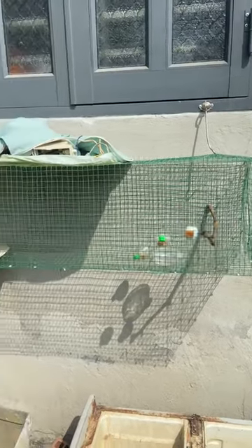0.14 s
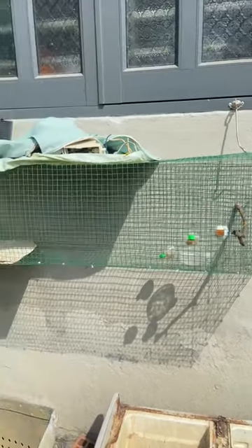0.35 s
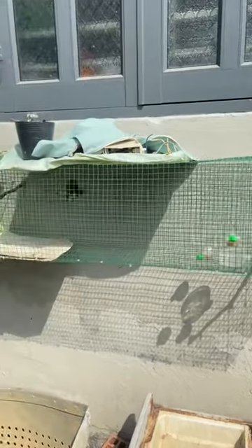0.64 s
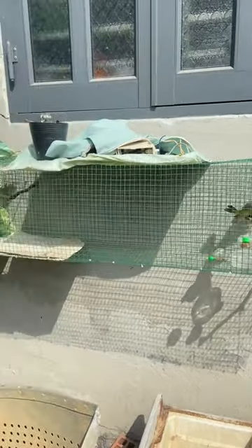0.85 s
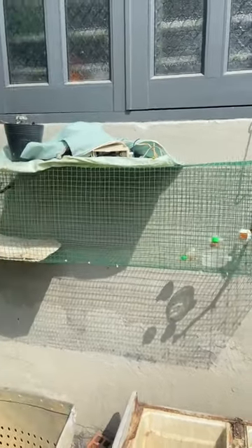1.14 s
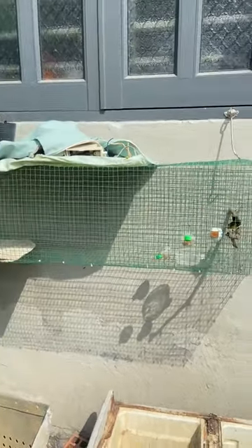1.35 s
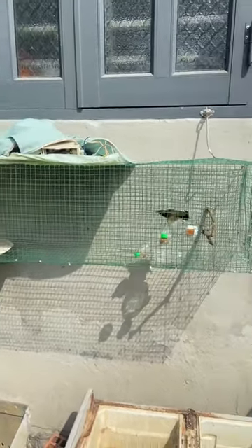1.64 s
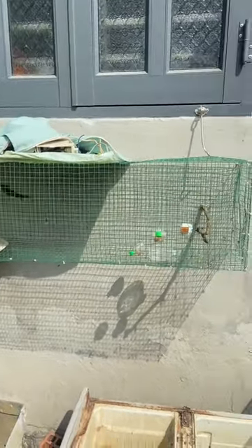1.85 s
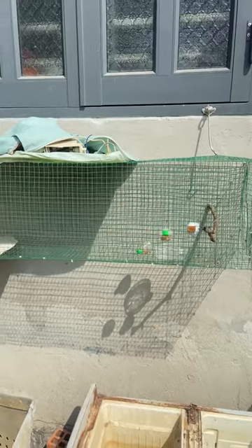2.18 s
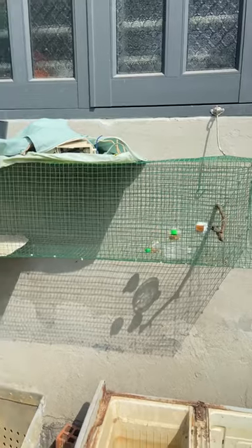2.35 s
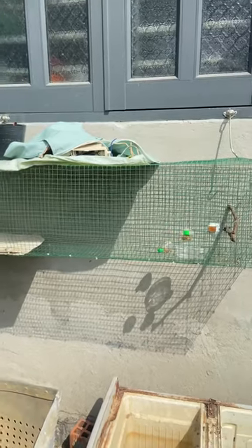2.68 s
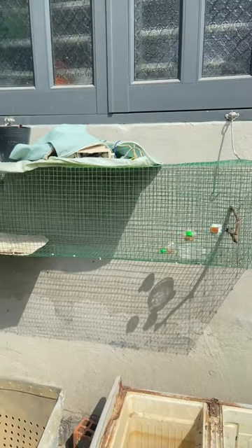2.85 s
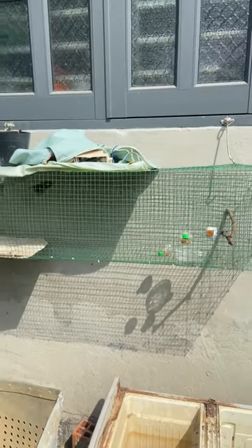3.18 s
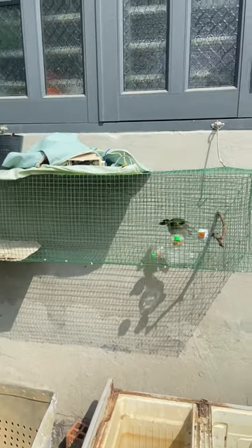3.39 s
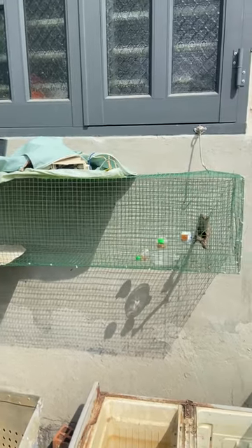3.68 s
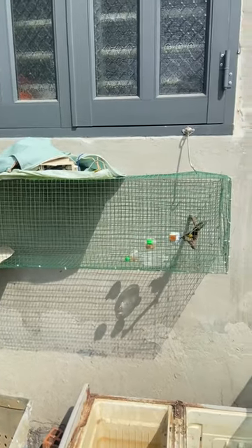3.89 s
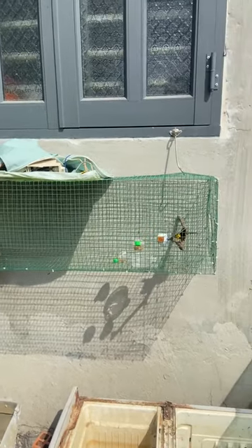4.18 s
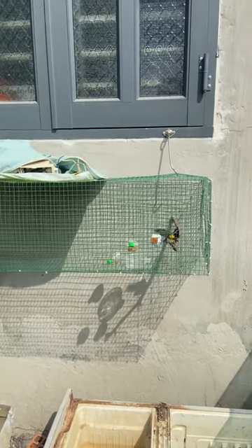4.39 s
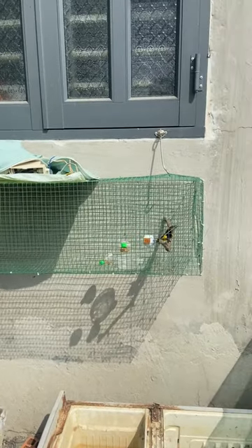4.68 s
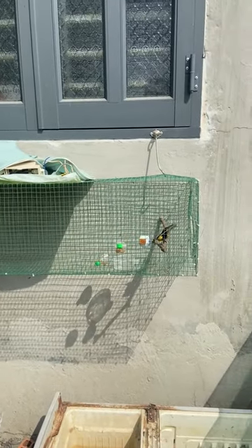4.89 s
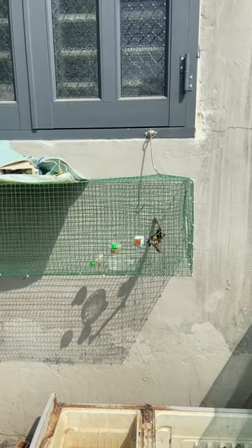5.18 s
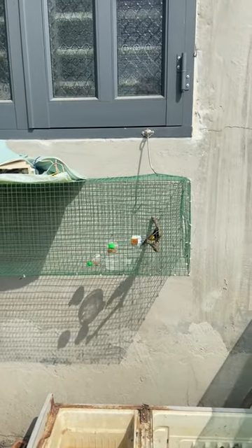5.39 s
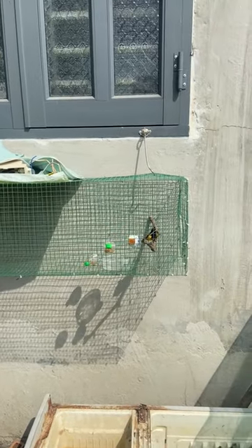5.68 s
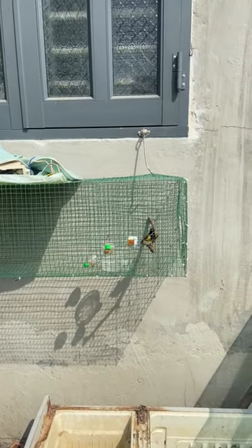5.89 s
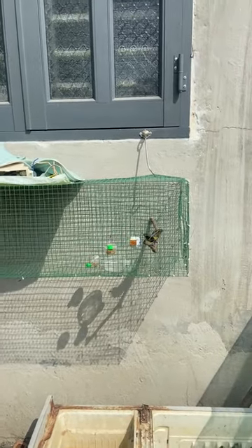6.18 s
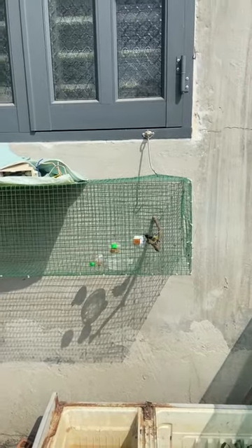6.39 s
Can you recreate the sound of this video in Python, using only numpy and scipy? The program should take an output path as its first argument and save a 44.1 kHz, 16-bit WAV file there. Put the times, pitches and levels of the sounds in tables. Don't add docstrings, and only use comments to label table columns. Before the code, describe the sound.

A low, uneven town rumble runs throughout, with short, close reflections from yard walls. Distant birds scold harshly, and a falling chirp comes at 0.4 s. A dull tap sounds at 0.6 s, just before the caged bird's first short, scratchy rasp; another follows at 1.8 s with a soft wing flick. Between 0.95 and 2.4 s a second bird, further away, whistles six nearly pure slurred notes, falling and rising. Quiet until wings flutter near 3.1 s and a faint rasp at 3.2 s. From 3.5 s the near bird sings: quick alternating rising chirps and small arches, getting louder, then from 4.3 s bright repeated buzzes with slurred chirps, about four a second, strongest near 4.8 s, closing with a clean falling note at 5.7 s. Tiny bright ticks dot the song. Low handling thumps at 6.2 s and a last dull tap at 6.5 s end it.

```python
import sys
import numpy as np
from scipy import signal
from scipy.fft import rfft, irfft
from scipy.io import wavfile
from scipy.ndimage import uniform_filter1d

SR = 44100
rng = np.random.default_rng(int(sys.argv[2]) if len(sys.argv) > 2 else 0)


def field_ratio(decibels):
    return 10 ** (np.asarray(decibels, dtype=float) / 20)


def persist_wave(psi):
    counts = np.round(np.clip(psi, -1, 1) * 32767).astype(np.int16)
    wavfile.write(sys.argv[1], SR, np.atleast_2d(counts).T)


N = 288414


def evened(x):
    return x / np.sqrt(np.mean(abs(x) ** 2) + 1e-20)


def read(points, hz):
    f, value = np.transpose(points)
    return np.interp(np.log(hz + 1), np.log(f + 1), value)


def add(mix, start_s, sound, pan_db):
    part = mix[:, round(start_s * SR):][:, :len(sound)]
    part += sound[:part.shape[1]] * field_ratio(np.array([[.5], [-.5]]) * pan_db)


def faded(x, share):
    return x * signal.windows.tukey(len(x), share)


def flutter(size, width_hz):
    z = rng.standard_normal((size, 2)) @ [1, 1j]
    bell = np.exp(-(np.fft.fftfreq(size, 1 / SR) / width_hz) ** 2)
    return evened(np.fft.ifft(z * bell))


def phasor(hz):
    return np.exp(2j * np.pi * np.cumsum(hz) / SR)


def yard(x, late_db):
    # hz, t60_s
    decay = [(500, 0.4), (3000, 0.3), (5000, 0.31), (6500, 0.19), (8000, 0.1), (11000, 0.18)]
    taps = np.zeros((3, SR))
    at = np.arange(500, SR - 20, 20) + rng.integers(0, 20, (3, (SR - 501) // 20))
    np.put_along_axis(taps, at, rng.choice([-1., 1.], at.shape), 1)
    hz, t, z = signal.stft(taps, SR, nperseg=256)
    fall_db = -60 * t / read(decay, hz)[:, None]
    envelope = field_ratio(fall_db) + field_ratio(late_db + 0.5 * fall_db)
    tail = signal.istft(z * envelope, SR, nperseg=256)[1]
    tail = tail[0] + tail[1:]
    return signal.fftconvolve(x[None], tail / np.linalg.norm(tail[0]), axes=1)[:, :N]


def episodes(t, events):
    edge_s = 0.067
    return sum(amount * np.clip(np.minimum(t - s, s + length - t) / edge_s + .5, 0, 1)
               for s, length, amount in events)


def town():
    # hz, level_db (per Hz)
    common = [(15, -49), (30, -9), (53, 9), (76, -7.5), (180, -15), (450, -25.5), (680, -37.5), (850, -62),
              (1080, -43.5), (1430, -33), (2200, -36.5), (4300, -46), (6000, -60.5), (15800, -64.5)]
    # hz, level_db (per Hz)
    opposite = [(15, -40), (25, -2), (63, -3.5), (137, -13), (587, -13), (1030, -19), (1280, -19),
                (1680, -34), (1820, -59), (2590, -38), (5370, -51.5), (7620, -55.5), (15800, -59.5)]
    # time_s, level_db
    traffic = [(0.0, 3.5), (1.3, 1), (3.9, 0.5), (4.1, -2), (6.1, 2), (6.3, 6), (6.54, 1.5)]
    # start_s, length_s, level_db
    hollow_fills = [(0.0, 0.57, 2.5), (.6, 0.088, 15), (.92, 0.055, -0.5), (1.44, 0.85, 3.5),
                    (3.117, 0.17, -0.5), (3.38, 0.79, 5), (4.76, 0.43, 1), (5.175, 0.49, 1), (6.118, .1, 3),
                    (6.22, 0.37, 11)]
    # start_s, length_s, level_db
    lower_dips = [(1.3, .13, -17.5), (3.054, .14, -28), (3.755, 0.22, -41), (4.037, 0.079, -16),
                  (4.62, 0.096, -12), (4.81, 0.31, -30), (5.377, 0.15, -7), (5.818, 0.14, -19)]
    hollow_floor_db = -32

    frames, hz = N // 512 + 5, np.fft.rfftfreq(2048, 1 / SR)
    t = (np.arange(frames) - 1) * 512 / SR
    hz = hz[:, None]
    a, b, c, d, patches = rng.standard_normal((frames, 1025, 5)).T
    patches = uniform_filter1d(uniform_filter1d(patches, size=9, axis=0), size=6, axis=1)
    patches = evened(patches) * np.clip(hz / 300, .3, 1)
    time_s, near_db = np.transpose(traffic)
    swell_db = np.interp(t, time_s, near_db) / (1 + (hz / 200) ** 2)

    filled = episodes(t, [(s, length, field_ratio(db)) for s, length, db in hollow_fills])
    hollow_db = 20 * np.log10(filled + field_ratio(hollow_floor_db)) * np.exp(-((hz - 1060) / 270) ** 6)
    hollow_db += 8.6 * patches[:, ::-1] * np.exp(-((hz - 800) / 300) ** 2)
    hollow_db += episodes(t, lower_dips) * np.exp(-((hz - 780) / 210) ** 6)

    mid_db = read(common, hz) + 4.1 * patches + swell_db + hollow_db - 62.0
    side_db = read(opposite, hz) + 1.7 * patches + swell_db - 71.0
    mid = (a + 1j * b) * field_ratio(mid_db)
    side = (c + 1j * d) * field_ratio(side_db)
    side -= .2 * mid / (1 + (hz / 90) ** 2)
    return signal.istft(np.array([mid + side, mid - side]), nperseg=2048, noverlap=1536)[1][:, :N]


def small_sounds():
    # start_s, peak_db, ring_hz, t60_s
    knocks = [
        (0.622, -46.5, 644, 0.027),
        (0.913, -62.5, 2340, 0.027),
        (6.486, -54.5, 640, 0.029),
        (3.729, -39, 4900, 0.0074),
        (4.3194, -42, 4760, 0.0062),
        (5.3408, -35.5, 4080, 0.0069),
        (6.2053, -48, 4350, 0.0048),
    ]
    # start_s, peak_db, pitch_hz, t60_s
    thumps = [
        (0.231, -49, 77, 0.22),
        (6.211, -37, 172, 0.045),
        (6.293, -36.5, 73, 0.15),
    ]
    # start_s, end_s, pitch_hz, level_db, share of opposite polarity (0-1)
    hums = [(1.6, 2.15, 180, -61, 0.18), (4.95, 6.2, 180, -65.5, 0.13), (4.5, 7.1, 300, -70, 0.34),
            (2.64, 2.79, 647, -62.5, 0.36), (6.1, 6.54, 2800, -92.5, 0.81), (3.0, 3.2, 3420, -82, 0.11),
            (5.88, 5.98, 1400, -76.5, 0.16), (1.45, 1.62, 1400, -79, .16), (2.18, 2.35, 1400, -78, .16),
            (4.3, 6.3, 1400, -84, .16), (3.22, 3.31, 700, -70, .3), (3.93, 4.01, 700, -72, 0.32),
            (4.35, 4.46, 700, -70, 0.35), (6.1, 6.19, 940, -77.5, 0.38), (5.61, 5.71, 700, -72, .3),
            (1.85, 2.0, 570, -77, 0.34)]

    out, t = np.zeros((2, N)), np.arange(8000) / SR
    for s, db, hz, t60 in knocks:
        ring = np.sin(2 * np.pi * hz * t) * field_ratio(-60 * t / t60) * np.minimum(t * hz / 2, 1)
        tick = uniform_filter1d(rng.standard_normal(len(t)), size=4) * field_ratio(-60 * t / 0.00132)
        add(out, s, field_ratio(db) * (ring + 0.3 * (hz < 3000) * tick), 0)
    for s, db, hz, t60 in thumps:
        thump = np.sin(2 * np.pi * hz * t) * np.minimum(t / 0.0077, 1)
        add(out, s, field_ratio(db - 60 * t / t60) * thump, -1.5)
    for start, end, hz, db, opposite in hums:
        u = np.arange(start, end, 1 / SR)
        width_hz = 5.2 + 75 * (680 < hz < 1000)
        tone = (flutter(len(u), width_hz) * np.exp(2j * np.pi * hz * u)).real
        hum = np.zeros((2, N))
        add(hum, start, field_ratio(db) * faded(tone, .3), 0)
        out += hum * [[1], [1 - 2 * opposite]]
    return out


def harsh_call(out, time_s, level_db, centre_hz, spread_hz, pulsed):
    t = np.arange(time_s[0], time_s[-1], 1 / SR)
    turn = phasor(np.interp(t, time_s, centre_hz))
    if pulsed:
        grain = 1 + 0.41 * np.cos(2 * np.pi * 170 * t)
    else:
        grain = 1 + .5 * flutter(len(t), 81).real
    harsh = grain * (flutter(len(t), spread_hz) * turn).real
    add(out, time_s[0], field_ratio(np.interp(t, time_s, level_db)) * faded(harsh, .1), 0)


def far_birds():
    # start_s, rise_s, fall_s, peak_db,
    # centre_hz
    scolds = [(.385, 0.016, 0.23, -65.5, 5460), (0.82, 0.18, 0.11, -67.5, 5100),
              (1.0, 0.14, 0.17, -67, 5320), (.395, .02, .045, -57, 5300), (1.56, 0.25, .02, -64, 4720),
              (2.45, 0.075, 0.25, -64, 5210), (3.08, 0.13, .01, -72, 4880), (3.25, .04, 0.25, -64, 5170),
              (3.6, .015, 0.048, -76, 2610), (2.2, 0.092, 0.097, -73, 6300), (3.72, 0.1, .2, -65, 2690),
              (3.93, 0.095, .03, -69, 2620), (5.35, 0.06, .08, -49.5, 4060), (.74, 0.046, .18, -66, 5500),
              (5.745, 0.012, 0.045, -68, 2750), (4.73, 0.012, 0.036, -67.5, 2900),
              (.44, .02, .05, -67, 2600), (6.15, 0.055, 0.22, -74, 5470), (6.42, 0.092, .02, -76.5, 4590)]
    # time_s, level_db, centre_hz
    chirp = [(.378, -73, 4790), (0.391, -65, 4900), (.403, -58, 4700), (0.408, -49, 4500),
             (.43, -50.5, 4330), (0.444, -52.5, 3850), (.462, -57, 3160), (0.474, -64, 3050),
             (0.499, -73, 2940)]
    out = np.zeros((2, N))
    for s, rise, fall, peak_db, hz in scolds:
        level_db = peak_db + np.array([-17, 0, -16.5])
        harsh_call(out, [s, s + rise, s + rise + fall], level_db, np.full(3, hz), 0.23 * hz, False)
    harsh_call(out, *np.transpose(chirp), spread_hz=680, pulsed=True)
    return out + field_ratio(-5.5) * yard(out.mean(0), late_db=-3.0)


def syllable(shape, pitch, length, spread_hz, puff_db):
    s, hz, db, rough = np.transpose(shape)
    t = np.arange(s[0] * length, s[-1] * length, 1 / SR)
    hz, db, rough = (uniform_filter1d(np.interp(t, s * length, c), 90) for c in (hz * pitch, db, rough))
    rough = np.clip(rough, 0, 1)
    throb_hz = 245 + 60 * flutter(len(t), 65).real
    throb = 1 + 0.55 * rough * np.cos(2 * np.pi * (np.cumsum(throb_hz) / SR + rng.random()))
    membrane = throb * (np.sqrt(1 - rough) + np.sqrt(rough) * flutter(len(t), spread_hz))
    turn = phasor(hz)
    tone = turn + field_ratio(-31.0) * turn ** 2 + field_ratio(-25.5) * turn ** 3
    breath = field_ratio(-28.0) * np.sqrt(rough) * np.diff(rng.standard_normal(len(t) + 2), 2)
    air = signal.lfilter(*signal.butter(4, 3400 / (SR / 2), "high"), rng.standard_normal(len(t)))
    puff = field_ratio(puff_db - 60 * (t - t[0]) / 0.15) * air
    voice = field_ratio(db) * ((membrane * tone).real + breath)
    return s[0] * length, faded(voice + puff, .06)


def caged_bird():
    # time_s (from the onset), pitch_hz, level_db, roughness (0-1)
    rasp = [(-.004, 4282, -16.5, 1), (.008, 5160, -8.5, 1), (0.022, 5600, 3, 1), (.036, 5847, 2.5, .7),
            (.052, 6300, -2, .6), (.066, 6520, -18, 0.5), (.07, 6600, -27, 0.5)]
    under = [(-.004, 2700, -30, .9), (.006, 3610, -23, .9), (.016, 4253, -11.5, .8), (.04, 4750, -8.5, .9),
             (.066, 4900, -19, .9)]
    opening = [(-.004, 5980, -1, 0), (.006, 6400, 6.5, 0), (.016, 6600, 1.5, 0.2), (.03, 6290, 4, 0.1),
               (.042, 6150, 9, .25), (.052, 5870, -13, 0)]
    rise = [(-.028, 4160, -22.5, 0.25), (-.018, 4204, -23, 0.15), (-.006, 4406, -15.5, 0.2),
            (-.001, 4840, -2.5, 0.11), (.012, 5285, 2, 0.04), (.024, 5280, -7, .15), (.028, 4820, -14, 0.3),
            (.033, 3970, -18, .4)]
    arch = [(-.003, 5880, -14, 0.1), (.006, 6415, 4, 0.2), (0.013, 6445, -15, 0.1),
            (.028, 7240, -15.5, 0.08), (.042, 6400, -6, .4), (.058, 5854, -8.5, 0.6)]
    pickup = [(-.001, 5956, -14.5, 0.3), (.008, 6296, -16.5, 0.3), (.014, 6270, -24, .5),
              (.018, 6120, -34, .5)]
    stroke = [(-.024, 2886, -40.5, 1), (-.008, 2897, -43, .7), (-.003, 4200, -27, .5),
              (.002, 5610, -28, .7)]
    buzz = [(-.003, 5940, -25, .4), (.0, 6024, -5.5, 0.31), (.012, 6394, -5.5, 0.39),
            (0.024, 6566, -15.5, 0.6), (.042, 6800, -14, 0.5), (.047, 6850, -31.5, 0.5)]
    hook = [(-.002, 4737, -12, 0.05), (.009, 5305, -6, 0.05), (.015, 5087, -14.5, 0.3),
            (.024, 4696, -12, 0.5), (.034, 4500, -13.5, 0.4), (.039, 4500, -26.5, 0.3)]
    slur = [(-.004, 4490, -20, 0.1), (0.0, 4614, -2.5, .05), (.014, 5304, 1.5, 0.03), (.022, 5642, -14, .2),
            (.034, 5250, -4, 0.45), (.047, 3880, -20.5, 0.85)]
    closing = [(-.046, 4810, -10, 0.1), (-.036, 5240, -6.5, 0.15), (-.02, 4450, -14, 0.5),
               (-.004, 4650, -12.5, 0.1), (0.0, 4744, 2, 0.07), (.02, 5387, -3, 0), (.034, 5000, -9.5, .2),
               (.044, 4150, -6, 0.2), (.05, 3525, -11.5, 0.2)]
    # start_s, peak_db, left_right_db, pitch factor, length factor
    rasps = [
        (0.652, -34, 0.045, 1.07, 1),
        (1.8107, -35, 0.18, 1.06, 0.94),
        (3.1866, -39, 0.72, 1, 1.12),
    ]
    openings = [
        (3.519, -45, 1, 1.001, 0.83),
    ]
    rises = [(3.5865, -29.5, -2, 0.99, 0.89), (3.763, -28, 0, 0.97, 1.11), (3.922, -26.5, -1.0, 0.99, 0.96),
             (4.0842, -26, 1, 1.001, 0.9), (4.2331, -25, -2, 0.99, 0.77)]
    arches = [(3.69, -33, -1, 0.98, 0.82), (3.8496, -30.5, -1, 1.012, 0.83), (4.012, -31.5, 0, 1.001, 0.91),
              (4.1619, -30, 1, 1.01, 1.001)]
    pickups = [(4.3205, -21.5, 0.5, 1.005, 0.97), (4.555, -19, 1.1, 1.02, 0.95),
               (4.806, -18.5, 0.4, 1.02, 0.9), (5.043, -21, 0.4, 1.01, 1.05),
               (5.292, -22.5, 0.1, 0.99, 1.1), (5.559, -23, 0.5, 1.001, 1.05)]
    buzzes = [(4.3413, -20.5, 0.98, 1, 0.97), (4.575, -19.5, 1.1, 1.02, 1.002),
              (4.8249, -18, 0.4, 1.015, 0.78), (5.0652, -19, 0.0, 1.012, 1.002),
              (5.3142, -19.5, 0.0916, 1.002, 1.002), (5.5807, -20, 0.55, 1, 0.93)]
    hooks = [(4.4124, -24.5, -2.5, 1.003, 0.99), (4.65, -24, 1.5, 0.98, 1.04),
             (4.898, -23.5, -3, 0.99, 0.99), (5.142, -25, -2.5, 0.99, 1.01), (5.386, -25, -2.5, 0.97, 1.05)]
    slurs = [(4.454, -23.5, -2.5, 0.99, 0.97), (4.6939, -24.5, 1.5, 0.98, 1.04),
             (4.9389, -24.5, -3.5, 0.98, 1), (5.1845, -24, -2.5, 0.98, 0.98), (5.429, -27, -3, 0.98, 1.11)]
    closings = [
        (5.7073, -27.5, 1.5, 1.001, 1.001),
    ]
    # shape, syllables, spread_hz, puff_db
    song = [
        (rasp, rasps, 520, -22), (under, rasps, 550, -60),
        (opening, openings, 450, -30), (rise, rises, 350, -40), (arch, arches, 500, -34),
        (pickup, pickups, 600, -19), (stroke, buzzes, 250, -60), (buzz, buzzes, 650, -30),
        (hook, hooks, 400, -40), (slur, slurs, 450, -50), (closing, closings, 450, -40)]

    out = np.zeros((2, N))
    for shape, rows, spread_hz, puff_db in song:
        for s, db, pan_db, pitch, length in rows:
            lead_s, sound = syllable(shape, pitch, length, spread_hz, puff_db)
            add(out, s + lead_s, field_ratio(db - 8.0) * sound, pan_db)
    ground = field_ratio(-5.0) * np.roll(out, round(.0042 * SR), axis=1)
    wall = field_ratio(-8.0) * np.roll(out[::-1], round(0.011 * SR), axis=1)
    smeared = out.mean(0) * (1 + 0.97 * flutter(N, 300).real)
    patchy = 1 + .4 * flutter(N, 30).real
    return out + ground + wall + field_ratio(-11.5) * yard(smeared, late_db=-8.0) * patchy


def whistler():
    # time_s, effort_db, pitch_hz
    whistles = [
        [(0.955, -86.5, 5400), (0.977, -63, 4220), (1.001, -43.5, 3920), (1.051, -42.5, 3576),
         (1.11, -37, 3579), (1.23, -56, 3430)],
        [(2.006, -58, 4595), (2.024, -43.5, 4615), (2.036, -36, 4190), (2.052, -44.5, 3245),
         (2.066, -35.5, 2851), (2.1, -42.5, 2690), (2.13, -42, 2640), (2.156, -46, 2744), (2.175, -57, 2700)],
        [(1.285, -53.5, 3890), (1.295, -40.5, 4020), (1.327, -37.5, 4070), (1.395, -36, 4168),
         (1.475, -35.5, 4204), (1.5, -49.5, 4046)],
        [(1.58, -61.5, 2800), (1.608, -42.5, 2723), (1.644, -33, 2772), (1.71, -36.5, 2932), (1.775, -36, 2953)],
        [(1.865, -50.5, 3110), (1.889, -38.5, 3413), (1.935, -36, 3344), (1.965, -53, 3320)],
        [(2.21, -54, 2780), (2.228, -48, 3220), (2.244, -39, 3260), (2.256, -38, 3367), (2.266, -33.5, 3342),
         (2.28, -32, 3262), (2.37, -50.5, 3277)],
    ]
    # left_right_db, overtones_db, wavering (0-1), width_hz
    headings = [(-0.5, -51, .37, 150), (0, -42, 0.9, 220), (0, -53, 0.5, 130), (0.5, -48, .45, 74),
                (6.5, -49, .37, 190), (8, -50, .3, 82)]
    out = np.zeros((2, N))
    for rows, (pan_db, overtones_db, waver, waver_hz) in zip(whistles, headings):
        s, *columns = np.transpose(rows)
        t = np.arange(s[0], s[-1], 1 / SR)
        db, hz = (uniform_filter1d(np.interp(t, s, c), 300, mode="nearest") for c in columns)
        turn = phasor(hz)
        fading = 1 + waver * flutter(len(t), waver_hz)
        glide = np.clip(abs(np.gradient(hz)) / .5, 0, .9)
        fading += glide * flutter(len(t), 260)
        overtones = field_ratio(overtones_db) * (.5 + flutter(len(t), 140)) * (turn ** 2 + 0.43 * turn ** 3)
        note = (fading * turn + overtones).real
        add(out, s[0], field_ratio(db + 0.5) * faded(note, .1), pan_db)
    return out + field_ratio(-8.0) * yard(out.mean(0), late_db=-11)


def wings():
    # start_s, length_s, first_db, last_db
    flights = [
        (1.545, 0.11, -74, -78.5),
        (1.797, 0.1, -63, -66.5),
        (3.054, .24, -89, -64.5),
        (3.404, 0.137, -74.5, -68.5),
        (6.401, 0.12, -98.5, -86),
    ]
    out = np.zeros((2, N))
    for s, length, first_db, last_db in flights:
        t = np.arange(0, length, 1 / SR)
        air = signal.lfilter([1, -1], np.poly([.75, .7, .4]), rng.standard_normal(len(t)))
        beats = 1 + .5 * np.cos(2 * np.pi * 28 * t)
        level = field_ratio(first_db + (last_db - first_db) * t / length - 4.0)
        add(out, s, level * beats * faded(evened(air), .3), 0)
    return out


def scene():
    return town() + small_sounds() + far_birds() + caged_bird() + whistler() + wings()


def starve(x):
    hz, t, z = signal.stft(np.array([x[0] + x[1], x[0] - x[1]]) / 2, SR, nperseg=1024)
    treble = hz[:, None] > 1500
    power = uniform_filter1d(abs(z) ** 2, size=7, axis=1)
    mask = uniform_filter1d(power[0] * treble, size=70, axis=0)
    mask = uniform_filter1d(mask, size=60, axis=0, origin=22)
    margin_db = 10 * np.log10((abs(power) + 1e-16) / (abs(mask) + 1e-16)) + 36.9
    keep = np.where(treble, np.clip(margin_db / 4, .03, 1), 1)
    mid, side = signal.istft(z * keep, SR, nperseg=1024)[1][:, :N]
    return np.array([mid + side, mid - side])


def passband(hz, low_hz, high_hz):
    return .25 * (1 + np.tanh((hz - low_hz) / 70)) * (1 - np.tanh((hz - high_hz) / 70))


def held(power):
    edges = np.r_[0, np.arange(930, N, 1024)]
    sizes = np.diff(np.r_[edges, N])
    means = np.add.reduceat(power, edges, axis=1) / sizes
    return abs(uniform_filter1d(np.repeat(means, sizes, axis=1), size=100))


def rebuilt_treble(z, hz):
    # low_hz, high_hz, upward_shift_hz
    copies = [(6890, 7580, 5512.5), (7580, 8960, 5512.5), (8960, 9650, 5512.5), (9650, 10680, 5512.5),
              (10680, 12400, 5512.5), (12400, 13600, 9647), (13600, 14120, 9647), (14120, 15850, 9647)]
    # filler_db (noise against the copy), band_gain_db, least_copy_db
    fills = [(3, -3, -67), (-4.5, 1, -66), (-12, -13, -64), (-5.5, 0, -59.5), (-13, 0, -64),
             (-12.5, -16, -63), (-9.5, -10, -65), (-14, -5.5, -60)]
    floor_db, weak_band_db, gate_db, gate_soft_db = -108, -11, -45, 5.5
    harsh_start_s, harsh_fade_s, harsh_lift_db = 2.015, 0.12, 19
    widen_db, top_widen_db, top_hz = 2, 3.5, 12000

    bottom_hz = copies[0][0]
    filler = rfft(rng.standard_normal((2, N)) + .6 * rng.standard_normal(N))
    core = rfft(starve(irfft(z * passband(hz, -SR, bottom_hz), N)))
    out = core
    late_s = np.arange(N) / SR - harsh_start_s
    harsh_db = harsh_lift_db * np.clip(1 - late_s / harsh_fade_s, 0, 1) * (late_s > 0)
    loud = held(irfft(core, N) ** 2)
    for (low, high, shift), (filler_db, band_gain_db, least_db) in zip(copies, fills):
        inside = passband(hz, low, high)
        copy = irfft(np.roll(core, round(shift * N / SR), axis=1) * inside, N)
        wanted = held(irfft(z * inside, N) ** 2)
        found = held(copy ** 2)
        noise = evened(irfft(filler * inside, N))
        copy = copy / np.sqrt(found + 1e-14) + field_ratio(filler_db) * noise
        level = wanted * field_ratio(2 * band_gain_db) + field_ratio(2 * floor_db)
        if band_gain_db < weak_band_db:
            over_db = 10 * np.log10(level / loud) - gate_db
            level = level * np.clip(over_db / gate_soft_db, .1, 1) ** 2
        level = level + found * field_ratio(2 * (least_db + harsh_db))
        out = out + inside * rfft(copy * np.sqrt(level / (1 + field_ratio(2 * filler_db))))
    widening = field_ratio(widen_db + top_widen_db * (hz > top_hz)) - 1
    return out + widening * passband(hz, bottom_hz, SR) * (out - out.mean(0))


def roll_off(x):
    return signal.sosfilt(signal.butter(12, 15940, fs=SR, output="sos"), x)


def record(dry):
    hz = np.fft.rfftfreq(N, 1 / SR)
    z = rfft(dry) / np.sqrt(1 + (42 / (hz + 1)) ** 10)
    mix = starve(irfft(rebuilt_treble(z, hz), N))
    return roll_off(mix)


dry = scene()
out = record(dry)
persist_wave(out)
```